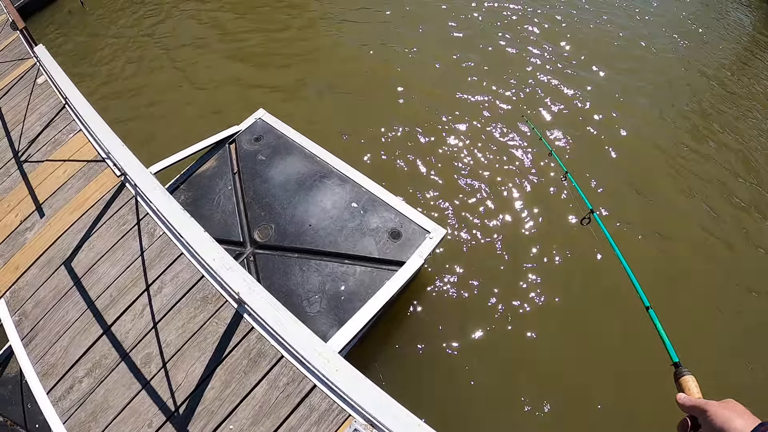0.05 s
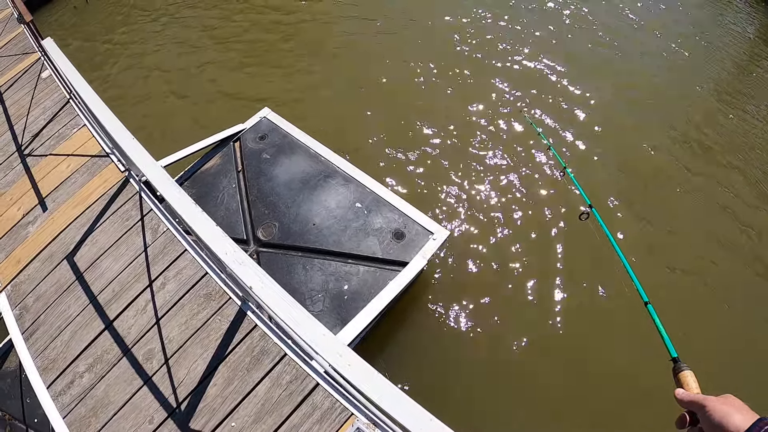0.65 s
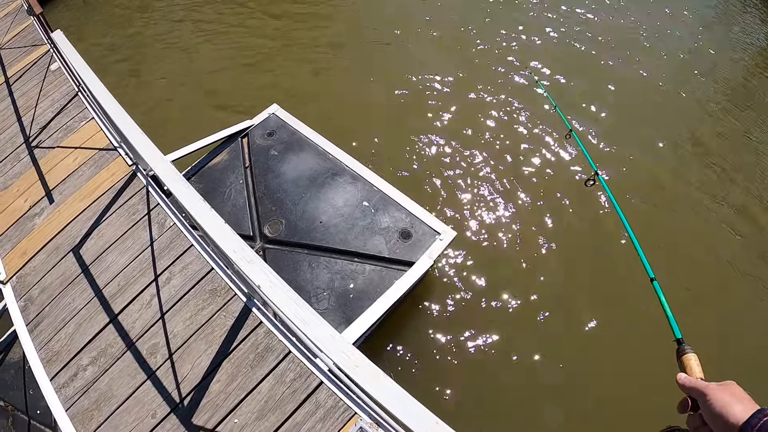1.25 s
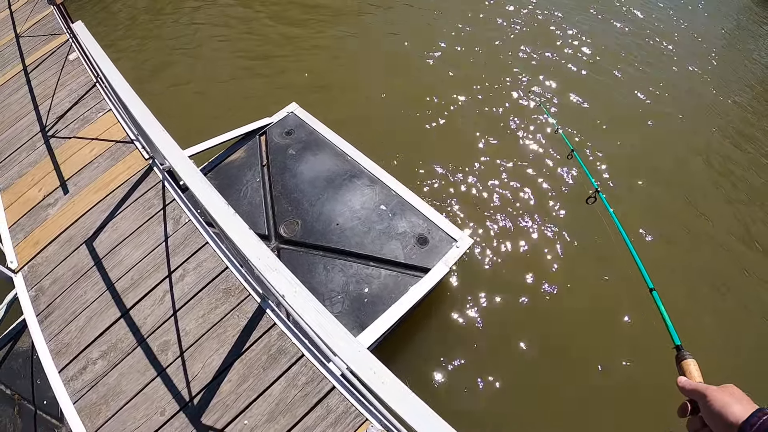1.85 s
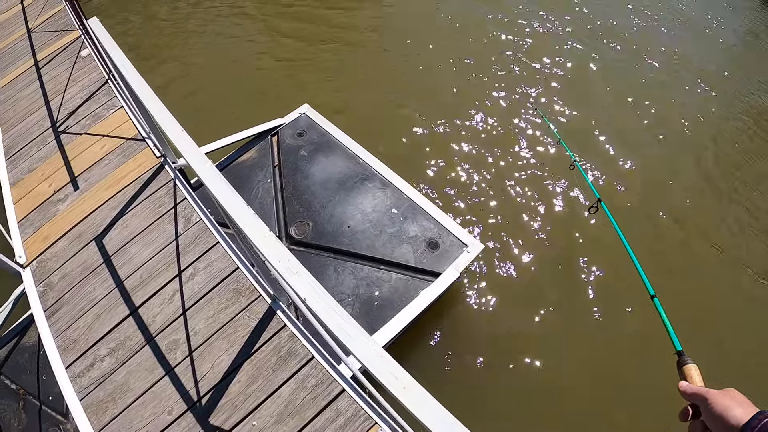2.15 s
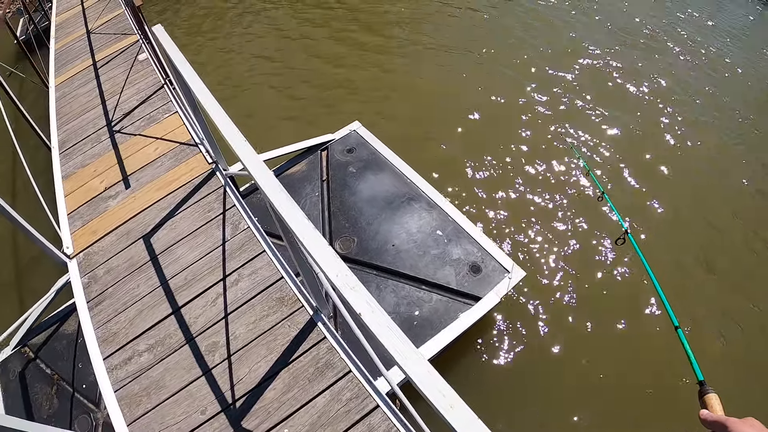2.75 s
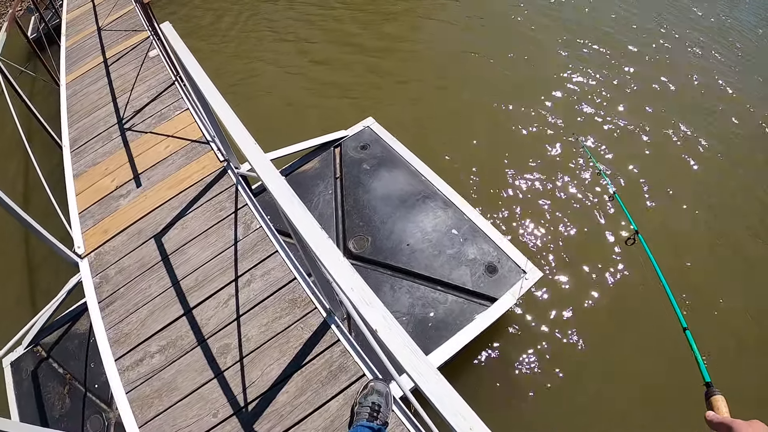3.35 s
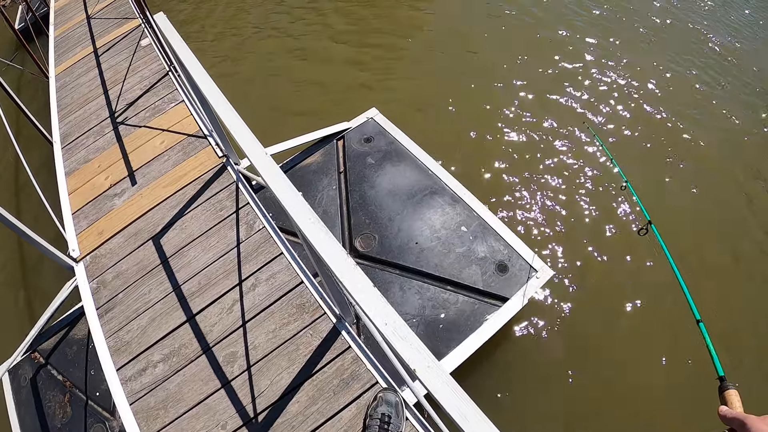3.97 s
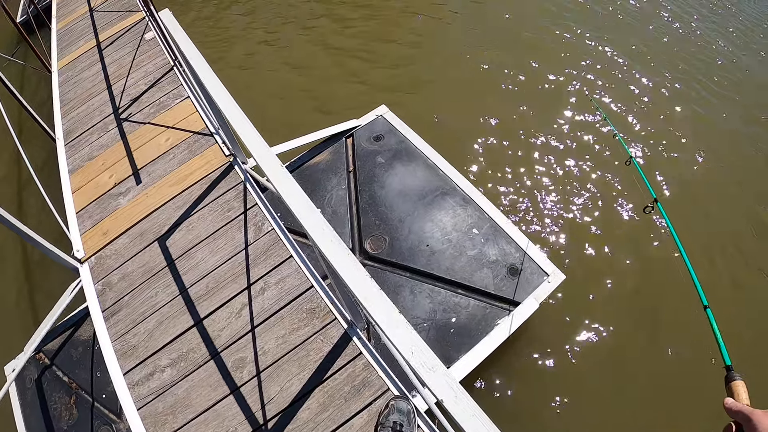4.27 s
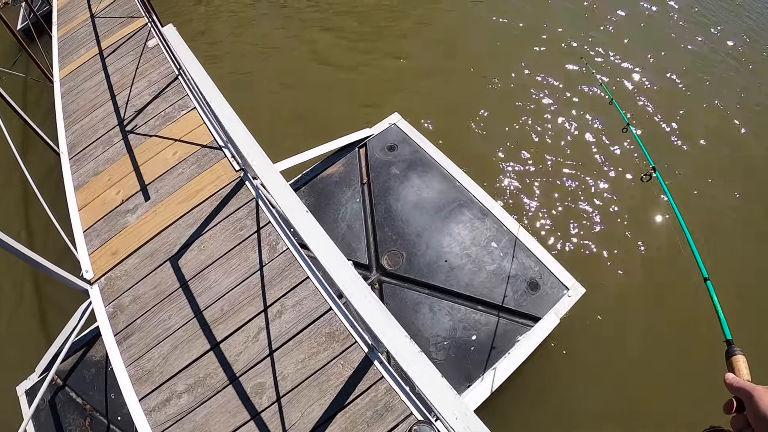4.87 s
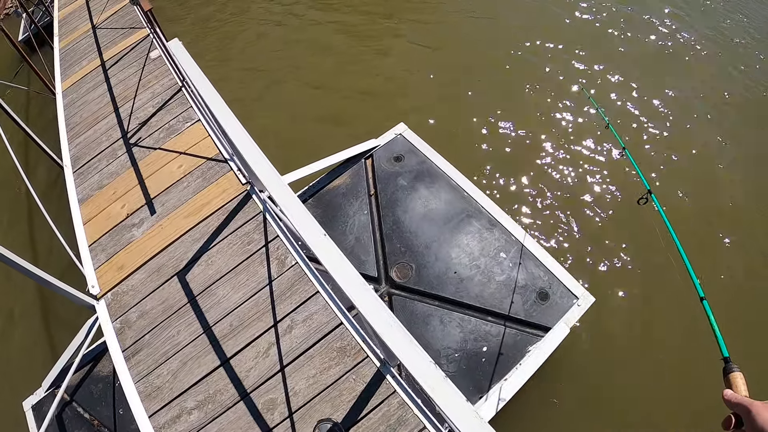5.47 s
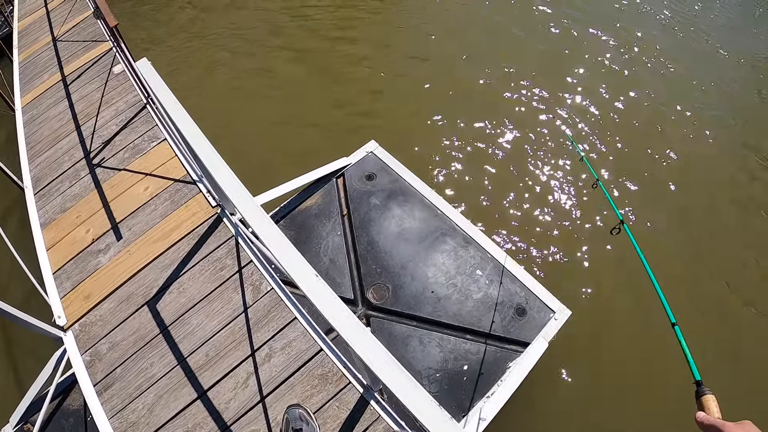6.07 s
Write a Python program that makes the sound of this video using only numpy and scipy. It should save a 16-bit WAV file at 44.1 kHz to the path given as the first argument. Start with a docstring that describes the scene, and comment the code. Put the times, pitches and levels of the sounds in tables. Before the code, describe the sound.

Water laps and gurgles gently under a floating dock, with one sharp knock and a few small clicks from fishing gear.

```python
"""Small waves slop and gurgle under a floating dock on a quiet lake, where someone is fishing.
Each wavelet sounds the hollow near 170 Hz and makes the float rumble. Close to the camera's stereo
microphone the gear gives one hard knock, then tackle rubs softly and small clicks ring the plastic case.
Behind it all are a few droplets, the wash of open water, a light breeze and a faint electronic whine."""
import sys
import numpy as np
from scipy import signal
from scipy.fft import rfft, irfft
from scipy.io import wavfile

SR = 44100
rng = np.random.default_rng(int(sys.argv[2]) if len(sys.argv) > 2 else 0)


def output_pcm(signal):
    """Save a mono or channel-first signal as 16-bit PCM at the path in sys.argv[1].

    Samples are clipped to [-1, 1] before scaling.
    """
    pcm = np.clip(np.atleast_2d(signal).T, -1, 1) * 32767
    wavfile.write(sys.argv[1], SR, np.round(pcm).astype(np.int16))


N = 274169
TIME = np.arange(N) / SR

# Wavelets under the dock. Each row: start and length in seconds, gurgle level in dB, rumble offset in dB.
LAPS = [(0.0, .29, -49, -5.5), (.33, 0.093, -59.5, 1), (0.473, .13, -55, -5.5), (0.654, 0.22, -54.5, -3),
        (0.931, 0.094, -50, -6), (1.192, 0.053, -65, -14), (1.458, 0.14, -56.5, -2.5),
        (1.696, .15, -55, -7), (1.877, 0.3, -55, -6.5), (2.279, 0.11, -51.5, -4), (2.357, .13, -46.5, -3),
        (2.55, 0.3, -52, -6), (2.903, 0.33, -49.5, -10), (3.185, 0.14, -44, -4.5), (3.348, 0.17, -48, -2.5),
        (3.876, 0.079, -59.5, -4), (4.01, 0.27, -63, -2.5), (4.325, 0.077, -52.5, -10),
        (4.438, .26, -51, -10), (4.77, 0.19, -56.5, -8.5), (4.933, 0.25, -52.5, -4),
        (5.198, 0.18, -52.5, -3), (5.345, 0.13, -49, -5), (5.514, 0.15, -53.5, -3),
        (5.662, 0.088, -47.5, -6.5), (5.786, 0.095, -45, -3), (5.926, 0.26, -49.5, -5)]
# Hand strokes on the tackle and gusts on the microphone. Each row: start, length in seconds, level in dB.
STROKES = [(2.57, 0.25, -58.5), (2.79, 0.21, -54.5), (3.01, 0.57, -60.5), (3.68, 0.34, -65.5),
           (3.96, 0.089, -55), (4.07, .04, -54.5), (4.195, 0.035, -56.5), (4.29, 0.11, -60.5),
           (4.51, 0.51, -62), (5.04, 0.52, -69), (5.74, 0.42, -65.5)]
GUSTS = [(3.45, 0.21, -49.5), (3.91, 0.066, -49), (4.05, 0.093, -44.5)]
# Gear clicks. Each row: start in seconds, level in dB, treble and thud offsets in dB,
# left minus right in dB, pitch factor of the treble modes.
CLICKS = [(2.4063, -43.5, -5, -6, 0, 1.03), (2.4104, -20.5, -11.5, -9, 2.5, 1.01),
          (2.5951, -50, -12, 8, 1, 1.4), (2.9612, -48.5, 1, -9, 3, 0.98), (3.314, -55, -2, -5, -4, 1.06),
          (3.5337, -45.5, -15, -22, -2, 1.2), (3.557, -48.5, -6.5, -8, 3, 1.17),
          (3.9544, -31.5, -4, -17, -0.5, 1.056), (3.9936, -45, 7.5, -19, 2, 0.99),
          (4.0229, -45.5, -7, -17, -3, 1.1), (4.0911, -43, -24, -7, -2, 0.82),
          (4.1993, -45.5, -15, -20, -2, 1.2), (4.5216, -49, -10, 7.5, 4, 1.1),
          (4.6006, -41.5, -19, -23, -2, 1.14), (5.1933, -53, -23, -11, 3, 0.75)]
# Tackle scuffs. Each row: start in seconds, level in dB, decay in seconds, tilt in dB per octave.
SCUFFS = [(2.686, -59, 0.042, 1), (2.73, -59.5, 0.009, 3), (2.843, -58.5, 0.032, 0.5),
          (4.207, -51.5, 0.011, -0.5), (4.516, -60.5, 0.021, 0.5), (4.635, -66.5, 0.034, 3.5),
          (4.81, -53, 0.037, -5), (5.929, -56, 0.012, 1.5)]
# Droplets on the lake. Each row: start in seconds, peak in dB, pitch in Hz.
DROPS = [(.855, -61, 5270), (1.193, -66, 4500), (1.582, -61, 3130), (3.277, -58, 4950), (4.288, -57, 4120)]

# Ringing modes. Each row: frequency in Hz, relative level in dB, seconds to fall by 60 dB.
GEAR_MODES = [(430, -10, 0.0069), (675, -3.5, 0.023), (1282, 1, 0.018), (1570, -5, 0.018),
              (1970, -6.5, 0.02), (2377, -17, 0.032), (2770, -14, 0.011), (2980, -23, 0.073),
              (4540, -20, .008)]
CASE_MODES = [(627, -21.5, 0.02), (806, -25.5, 0.045), (1137, -16.5, 0.019), (1493, -5, 0.013),
              (1536, 8.5, 0.0063), (1880, -30, 0.063), (2220, -28, 0.032)]
CASE_TREBLE_MODES = [(3055, -9, 0.065), (3110, 12, 0.0071), (3300, -8.5, 0.021), (4380, -9, 0.02),
                     (5140, -16, 0.022), (6670, -17.5, 0.012), (7780, -25, 0.011)]

# Noise colours. Each row: frequency in Hz, relative spectral density in dB.
HOLLOW_COLOUR = [(60, -25), (95, -14), (120, -6), (150, 2.5), (178, 3.5), (215, -3), (260, -16), (360, -25),
                 (520, -26), (760, -29), (1000, -28), (1400, -26), (2500, -45.5), (9000, -85)]  # the air space under the dock
RUMBLE_COLOUR = [(6, 3), (14, 6.5), (25, 4.5), (45, -1.5), (72, 3), (100, -8.5), (160, -25), (400, -67),
                 (2000, -110)]  # the float and the breeze
WASH_COLOUR = [(100, 3), (200, 6.5), (450, -2), (850, -9), (1100, -2.5), (1300, 4.5), (1700, -4.5),
               (2600, -13), (3200, -10.5), (4000, -15.5), (6000, -15.5), (7400, -25), (9000, -38),
               (12500, -38)]  # open water
SNAP_COLOUR = [(700, 8), (1500, -7), (2700, 4), (3700, -5.5), (4700, 4), (6000, -5), (7500, -16.5),
               (9000, -29), (12500, -35.5), (15000, -63)]  # hard contact in the gear
RUB_COLOUR = [(250, -30), (400, -16), (700, -14), (930, -11.5), (1150, -9.5), (1340, 2.5), (1520, -2.5),
              (1800, -9.5), (2500, -22.5), (3100, -11), (3700, -27), (5200, -26.5), (6700, -44.5),
              (11000, -72.5)]  # tackle heard through the case
SCUFF_COLOUR = [(500, -29), (1000, -11), (1350, 5), (1900, -6.5), (2500, -16.5), (3300, -6.5),
                (4300, -16.5), (5400, -15.5), (7000, -34), (9000, -46), (14000, -75)]
GUST_COLOUR = [(4, -11), (10, 2), (25, -14.5), (60, -36.5), (150, -65), (2000, -110)]

# Balance of the two microphone ports. Each row: frequency in Hz, left minus right in dB.
PORT_BALANCE = [(60, 4.5), (86, 9), (120, -2.5), (180, 1), (250, -2.5), (360, -2.5), (510, -3.5),
                (730, -9.5), (1050, -0.5), (1490, 3), (2140, -3), (3050, 5), (4370, -4), (6240, 0.5)]
# Likeness of the ports. Each row: frequency in Hz, share of power common to both.
PORT_LIKENESS = [(50, 0.93), (180, 0.82), (400, 0.53), (800, 0.22), (1400, 0.74), (3000, 0.66),
                 (6000, 0.61), (9000, 0.32)]
# Phase between the ports. Each row: frequency in Hz, lead of the left in radians.
PORT_LEAD = [(20, -0.5), (160, -0.01), (260, 0), (520, 1), (1030, -0.5), (1380, -1), (1810, -1.5),
             (2070, -2), (3100, -1.47), (4130, -1.5), (5200, -2), (8000, -4.5)]
# Tones of the camera's electronics. Each row: frequency in Hz, left and right levels in dB.
WHINE_TONES = [(5918, -107, -82.5), (7892, -99, -109)]


def water():
    """Wavelets slap in the hollow underfoot and make the float rumble, over the soft wash of the lake."""
    lap_shape = dict(rise_s=0.025, fall_s=0.057, sag_db_per_s=4.5)
    lapping = swells([(s, length_s, db) for s, length_s, db, _ in LAPS], **lap_shape)
    heaving = swells([(s, length_s, db + low_db) for s, length_s, db, low_db in LAPS], **lap_shape)
    calm = gain_of(-68.5)  # the gurgle between wavelets
    slaps = grains(per_s=260, spread_db=2)
    gurgle = at_ports(slaps, HOLLOW_COLOUR) * np.hypot(lapping, calm) * gain_of(-0.68)
    rumble = at_ports(rng.standard_normal(N), RUMBLE_COLOUR) * heaving * gain_of(1.5) * panned(0.68)
    ripples = grains(per_s=3000, spread_db=1)
    wash = at_ports(ripples, WASH_COLOUR) * gain_of(-63.5 + 0.7 * drift(rate_hz=10))
    return gurgle + rumble + wash


def knock():
    """Close by, a blow rings the gear and jolts the camera; a catch snaps shut just after."""
    blow_s, jolt_s, snap_s = 1.006, 1.0071, 1.0116
    out = np.zeros((2, N))
    clack = ring(GEAR_MODES, contact_s=0.0013, lag_s=0.00014)
    lingering_note = ring([(872, 0, 0.083)], contact_s=0.0032, lag_s=0.00027)
    tick = burst(SNAP_COLOUR, decay_s=0.0023, rise_s=0.00055)
    add(out, blow_s, gain_of(-16) * panned(-1.1) * clack)
    add(out, blow_s, gain_of(-26.5) * panned(-6) * lingering_note)
    add(out, blow_s, gain_of(-39) * panned(-2.5) * tick)
    # the jolt shoves the air at the ports and sets off a short, boxy thump
    shove = air_shove(decay_s=0.0055, contact_s=0.0032)
    thump = -ring([(195, 0, 0.03), (340, -9, 0.018)], contact_s=0.001)
    add(out, jolt_s, gain_of(-15.5) * panned(4.4) * shove)
    add(out, jolt_s, gain_of(-21) * thump)
    snap = burst(SNAP_COLOUR, decay_s=0.0024, rise_s=0.00038)
    snap_tail = gain_of(-24.5) * burst(SNAP_COLOUR, decay_s=0.013, rise_s=0.001, tilt_db=-0.5)
    add(out, snap_s, gain_of(-27.5) * panned(-5.5) * (snap + snap_tail))
    return out


def clicks():
    """Each click of the gear rings the camera case, with its own share of bright edge and low thud."""
    body = ring(CASE_MODES, contact_s=0.0018, lag_s=0.00008)
    thud = ring([(158, 5.5, 0.02), (332, -2, 0.02)], contact_s=0.0027)
    out = np.zeros((2, N))
    for s, db, treble_db, thud_db, side_db, pitch in CLICKS:
        # where the click lands shifts the upper modes; the contact itself adds a gritty tick
        edge = ring(np.multiply(CASE_TREBLE_MODES, [pitch, 1, 1]), contact_s=0.00057, lag_s=0.00004)
        tick = gain_of(-15.5) * burst(SNAP_COLOUR, decay_s=0.0026, rise_s=0.0004)
        click = body + gain_of(treble_db) * (edge + tick) + gain_of(thud_db) * thud
        add(out, s, gain_of(db) * panned(side_db) * click)
    return out


def rubbing():
    """Tackle handled near the microphone: clumps of tiny slips under each stroke, and a few scuffs."""
    slips = grains(per_s=750, spread_db=2.5)
    pressure = swells(STROKES, rise_s=0.014, fall_s=0.035, sag_db_per_s=3)
    out = at_ports(slips, RUB_COLOUR) * pressure * gain_of(0.57 + 1.1 * drift(rate_hz=13))
    for s, db, decay_s, tilt_db in SCUFFS:
        add(out, s, gain_of(db) * burst(SCUFF_COLOUR, decay_s, rise_s=0.0044, tilt_db=tilt_db))
    return out


def drops():
    """Droplets land on the lake, each a brief wet tick around its own pitch."""
    out = np.zeros((2, N))
    for s, db, hz in DROPS:
        colour = [(0.3 * hz, -30), (0.85 * hz, -13), (hz, 0), (1.15 * hz, -16), (2 * hz, -50)]
        add(out, s, gain_of(db) * peaked(burst(colour, decay_s=0.005, rise_s=0.002)))
    return out


def breeze():
    """Wind on the microphone: a lumpy low rumble with a few deep gusts, stronger at the left port."""
    rumble = at_ports(rng.standard_normal(N), RUMBLE_COLOUR) * gain_of(-72 + 2.5 * drift(rate_hz=5))
    gusts = at_ports(rng.standard_normal(N), GUST_COLOUR) * swells(GUSTS, rise_s=0.018, fall_s=0.048)
    return (rumble + gusts) * panned(2.7)


def whine():
    """Thin tones from the camera's electronics, steady in level and wavering a little in pitch."""
    out = np.zeros((2, N))
    for hz, left_db, right_db in WHINE_TONES:
        phase = 2 * np.pi * hz * TIME + 1.3 * drift(rate_hz=14)
        out += np.sqrt(2) * gain_of([[left_db], [right_db]]) * np.sin(phase)
    return out


def at_ports(drive, colour):
    """Colours a drive and spreads it over the two microphone ports, partly shared, partly diffuse."""
    hz = np.fft.rfftfreq(N, 1 / SR)
    likeness = np.clip(curve_at(PORT_LIKENESS, hz), 0, 1)
    shared = np.sqrt(likeness) * rfft(evened(drive))
    diffuse = np.sqrt(1 - likeness) * rfft(rng.standard_normal((2, N)))
    phase_turn = np.exp(0.5j * np.array([[1], [-1]]) * curve_at(PORT_LEAD, hz))
    balance = panned(curve_at(PORT_BALANCE, hz))
    return evened(irfft((shared + diffuse) * phase_turn * gain_of(curve_at(colour, hz)) * balance, N))


def ring(modes, contact_s, lag_s=0):
    """Dying modes (Hz, dB, t60 in seconds) swell during contact; the left port hears them lag_s later."""
    t = np.maximum(np.arange(SR // 5) / SR - np.array([[lag_s], [0]]), 0)
    ringing = sum(gain_of(db - 60 * t / t60) * np.sin(2 * np.pi * hz * t) for hz, db, t60 in modes)
    return peaked(ringing * onset(t, contact_s))


def air_shove(decay_s, contact_s):
    """A dull push of air at the microphone: one short swing and a longer one back."""
    t = np.arange(SR // 5) / SR
    swell = onset(t, contact_s) * np.exp(-t / decay_s)
    return -peaked(np.gradient(swell))[None]


def burst(colour, decay_s, rise_s, tilt_db=0):
    """A short spray of coloured noise, tilted by tilt_db per octave, that swells and dies."""
    t = np.arange(SR // 5) / SR
    hz = np.fft.rfftfreq(len(t), 1 / SR)
    spectrum = gain_of(curve_at(colour, hz) + tilt_db * np.log2(hz + 1))
    noise = evened(irfft(rfft(rng.standard_normal((2, len(t)))) * spectrum, len(t)))
    return noise * peaked(np.exp(-t / decay_s) * (1 - np.exp(-t / rise_s)))


def swells(rows, rise_s, fall_s, sag_db_per_s=0):
    """The gain of overlapping events: each rises, holds with a sag, and dies."""
    power = np.zeros(N)
    for s, length_s, db in rows:
        t = np.maximum(TIME - s, 0)
        release = np.exp(-np.maximum(t - length_s, 0) / fall_s)
        power += (onset(t, rise_s) * release * gain_of(db - sag_db_per_s * t)) ** 2
    return np.sqrt(power)


def grains(per_s, spread_db):
    """Random impulses of uneven size, rms 1."""
    size = gain_of(spread_db * np.minimum(rng.exponential(1, N), 4))
    return evened(size * rng.choice([-1, 1], N) * (rng.random(N) < per_s / SR))


def drift(rate_hz):
    """A slow random wander of rms 1, up to about the given rate."""
    hz = np.fft.rfftfreq(N, 1 / SR)
    return evened(irfft(rfft(rng.standard_normal(N)) / (1 + (hz / rate_hz) ** 4), N))


def onset(t, rise_s):
    """A smooth rise from 0 to 1."""
    return 1 - np.exp(-(t / rise_s) ** 2)


def gain_of(db):
    """Decibels to amplitude."""
    return 10 ** (np.asarray(db) / 20)


def evened(x):
    """Scales to rms 1."""
    return x / np.sqrt(np.mean(x ** 2) + 1e-20)


def peaked(x):
    """Scales to peak 1."""
    return x / abs(x).max()


def curve_at(points, hz):
    """Interpolates rows of (Hz, value) on a log-frequency axis."""
    point_hz, value = np.transpose(points)
    return np.interp(np.log(hz + 1), np.log(point_hz + 1), value)


def panned(side_db):
    """Left and right gains for a level difference, left minus right."""
    return gain_of(np.array([[0.5], [-0.5]]) * side_db)


def add(mix, s, sound):
    """Mixes a sound in at s seconds."""
    part = mix[:, round(s * SR):][:, :sound.shape[1]]
    part += sound[:, :part.shape[1]]


def scene():
    """The dock in open air, with no echo."""
    return water() + drops() + breeze() + rubbing() + clicks() + knock() + whine()


def record(dry):
    """The camera cuts the treble above 13.9 kHz."""
    lowpass = signal.firwin(511, 13900, window=("kaiser", 9), fs=SR)
    return signal.oaconvolve(dry, lowpass[None], "same")


dry = scene()
out = record(dry)
output_pcm(out)
```